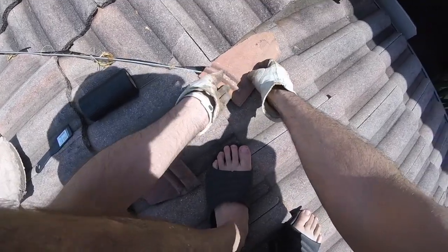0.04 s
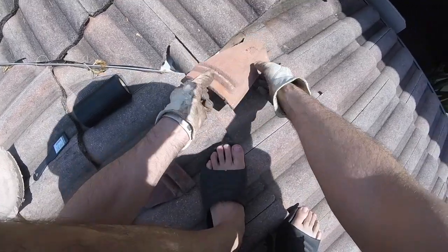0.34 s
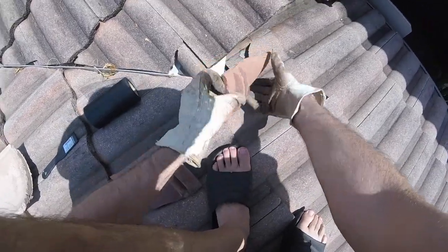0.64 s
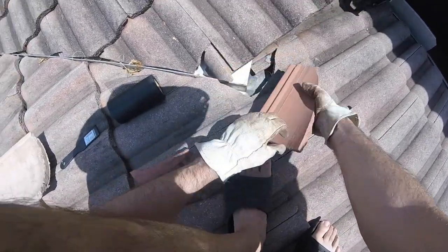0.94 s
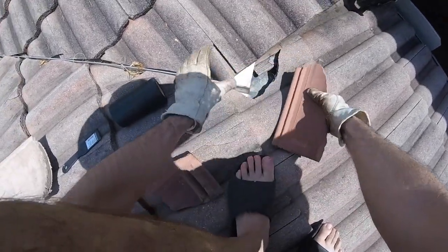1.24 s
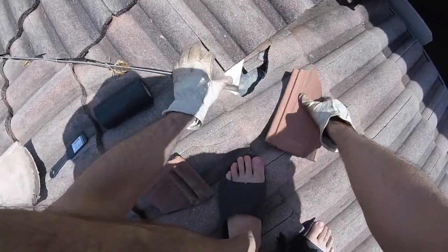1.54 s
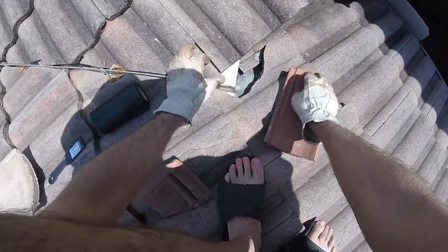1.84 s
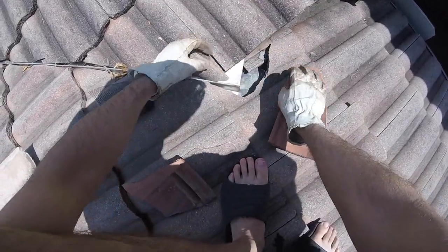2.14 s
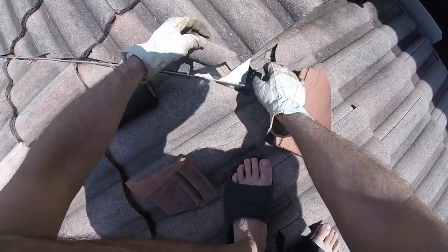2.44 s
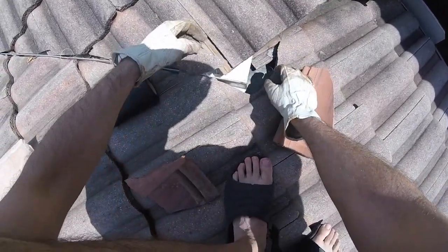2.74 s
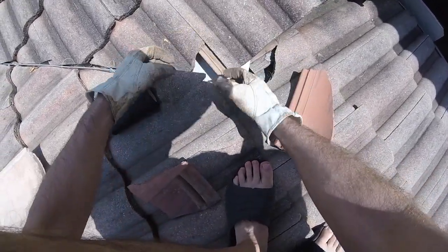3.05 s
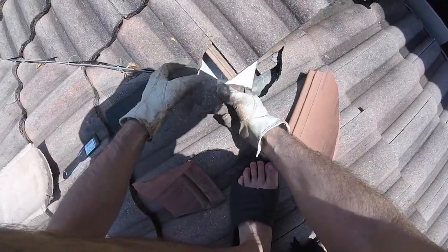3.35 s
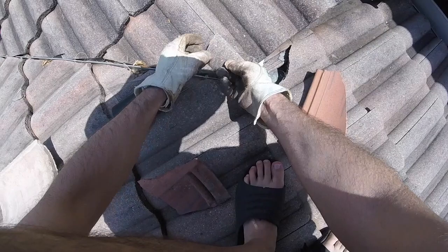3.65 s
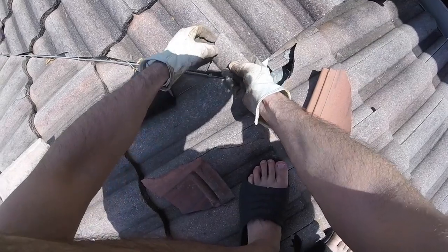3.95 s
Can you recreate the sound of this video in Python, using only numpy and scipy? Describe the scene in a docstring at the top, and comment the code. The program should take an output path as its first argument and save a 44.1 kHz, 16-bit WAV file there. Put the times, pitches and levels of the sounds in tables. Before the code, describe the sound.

Ceramic tile pieces scrape, clink and knock on a roof, with wind rumbling on the microphone.

```python
"""Wind rumbles on a head-worn camera's microphone as a long tile offcut is dragged over a tiled roof.
The offcut is set down and slid along, a broad tile knocks and is shifted, and a small shard clinks.
Each piece rings with its own fading tones (modes), set off by a tap or by sand catching under it.
Gloves rub, crumbs of tile drop and the roof adds a short echo. The wind gusts throughout."""
import sys
import numpy as np
from scipy import signal
from scipy.fft import rfft, irfft
from scipy.io import wavfile
from scipy.ndimage import uniform_filter1d, map_coordinates

SR = 44100
rng = np.random.default_rng(int(sys.argv[2]) if len(sys.argv) > 2 else 0)


def wav_out(sig):
    """Save sig, one row per channel (or a flat mono array), as 16-bit PCM at SR to the path in sys.argv[1]."""
    wavfile.write(sys.argv[1], SR, np.round(np.clip(np.atleast_2d(sig).T, -1, 1) * 32767).astype(np.int16))


N = 176400

# Levels in mode and colour tables are relative; t60 is the time a tone takes to fade by 60 dB.
# the offcut's tones: f/Hz, t60/s, then level/dB when touched on its end, face, edge, corner
OFFCUT_MODES = [(1093, 0.26, 5, -14.5, 1, 0.5), (1337, 0.042, 2, -1, 1.5, -7),
                (1376, 0.3, -6, -9.5, 1, -7.5), (2560, 0.17, -9.5, -4.5, 0.5, -15),
                (2960, 0.045, -15.5, 6, 7.5, -22), (3041, 0.12, -10.5, 3.5, -5.5, -10.5),
                (3650, 0.09, -10, -11, 6.5, -16), (3880, 0.13, -42, 0.5, -27, -33),
                (4450, 0.38, -15, -11, -27, -5), (4686, 0.087, -2, -0.5, 8, -3),
                (5050, 0.062, -11.5, 5, -1, -5), (6280, 0.074, -4.5, -6.5, -5, 0.5),
                (6520, 0.11, -12, -27, -1, -6), (7500, 0.042, -33, -9.5, -7, -32),
                (8270, 0.056, -25, -16, -10, -9), (9470, 0.079, -36, -25, -10, -32),
                (10590, .09, -40, -20, -33, -23.5)]
# the offcut touches the roof: t/s, ring/dB, clack/dB, treble tilt/dB per octave, place touched
OFFCUT_TAPS = [(.086, -45.5, -57, -1.5, "face"), (.243, -25, -41.5, 0.5, "face"),
               (.317, -21, -30, 0, "face"), (.362, -21, -38, -16.5, "face"),
               (0.421, -25.5, -27.5, -9, "face"), (1.2985, -21.5, -19.5, -2.5, "end"),
               (1.3263, -33, -44, 11, "end"), (1.3371, -29, -37, 0.5, "edge"), (1.42, -35, -42, 5.5, "end"),
               (1.4705, -41, -35, 0, "end"), (1.6375, -40, -60, 6.5, "end"),
               (1.7584, -39.5, -58, 10, "end"), (1.9003, -46.5, -45.5, 4, "corner"),
               (2.557, -39, -37.5, -5.5, "edge"), (2.699, -52.5, -64, -4, "corner"),
               (2.786, -38, -51, -2.5, "corner"), (2.818, -42.5, -34.5, -1.5, "corner"),
               (2.893, -39.5, -41, 0, "corner"), (2.955, -53.5, -44, -1, "face"),
               (3.0308, -43, -47, 1, "end"), (3.202, -46, -54, -6, "face"),
               (3.217, -44.5, -54, 4.5, "face"), (3.255, -39.5, -55, 4.5, "end"),
               (3.5498, -42.5, -63, 1.5, "end")]
# the offcut rings as it is dragged on its face: t/s, level/dB
DRAG_LEVELS = [(.21, -58), (.238, -31), (.247, -28), (.33, -28), (.38, -22.5), (.425, -32.5), (.44, -43),
               (.472, -38), (.5, -86)]
# the roof grinds beneath it: t/s, level/dB
GRIND_LEVELS = [(.228, -79), (.246, -32), (.35, -33), (.41, -29), (.44, -35.5), (.477, -29), (.52, -58)]
# the offcut slides on its edge: t/s, level/dB
SLIDE_LEVELS = [(1.325, -59), (1.345, -46), (1.378, -30.5), (1.455, -39), (1.482, -27), (1.55, -33),
                (1.575, -56), (1.75, -65)]
# the dead clack of tile lying on tile: f/Hz, level/dB
CLACK_COLOUR = [(100, -3), (330, 10), (620, 2.5), (2800, -10.5), (4500, -5.5), (6500, -12), (9000, -23.5),
                (14000, -41)]
# the broad tile's tones, damped by the glove: f/Hz, t60/s, level/dB
BROAD_TILE_MODES = [(793, 0.043, -2.5), (1402, 0.044, 1), (1520, .06, -1), (1797, 0.031, -1),
                    (1898, 0.015, 11), (2144, 0.021, 4), (2760, 0.029, 7), (2990, 0.031, 3.5),
                    (5564, 0.082, -6.5)]
# the broad tile knocks on the roof: t/s, level/dB, treble tilt/dB per octave
KNOCKS = [(1.5638, -16.5, -2.5), (1.5668, -17, -2.5), (1.5712, -24, -2.5), (1.583, -25.5, -6.5)]
# the shard's tones: f/Hz, t60/s, then level/dB when touched on its side, on a corner
SHARD_MODES = [(1694, 0.081, -3, 0), (3877, 0.13, 4, 0.5), (4718, 0.11, -10, 5), (5220, 0.026, 1, -6),
               (7980, 0.077, -8.5, -2), (10130, 0.042, -27, -14.5)]
# the shard touches other tiles: t/s, ring/dB, clack/dB, treble tilt/dB per octave, place touched
SHARD_TAPS = [(1.98, -32, -38, 2.5, "side"), (2.357, -47.5, -41, 1, "corner"),
              (2.408, -42, -37.5, 0, "side"), (2.432, -41, -40.5, 0, "side"),
              (2.509, -29, -29.5, 1, "side"), (3.585, -23.5, -26.5, 1.5, "corner")]
# a tile is shoved over the gritty roof: t/s, level/dB, width/s, centre f/Hz
SCUFFS = [(.385, -32, 0.039, 1160), (0.853, -43, 0.019, 1090), (1.999, -32, 0.023, 3160),
          (2.075, -45.5, 0.06, 2520), (2.178, -45.5, 0.0077, 2500), (2.258, -40, .016, 3560),
          (2.301, -29.5, 0.0092, 1030), (2.439, -37.5, 0.032, 910), (2.494, -38, 0.0053, 2200)]
# crumbs of tile drop: t/s, level/dB
CRUMB_DROPS = [(1.936, -37), (3.687, -52), (3.701, -45), (3.713, -43)]
# a crumb's tick: f/Hz, level/dB; and its fade time
CRUMB_COLOUR, CRUMB_FADE_S = [(1200, -21), (3800, 9), (11000, -31)], 0.00093
# gloves rub on tile: t/s, level/dB
RUB_LEVELS = [(0, -63.5), (.13, -51.5), (.55, -52), (.71, -61.5), (.8, -55), (1.04, -48.5), (1.16, -51),
              (1.23, -65), (1.66, -49), (1.87, -55.5), (2.74, -62), (3.18, -54.5), (3.28, -43.5),
              (3.38, -53), (3.72, -60.5), (4, -57)]
# the hiss of that rubbing: f/Hz, level/dB
RUB_COLOUR = [(400, 5), (1200, 2.5), (2500, -1), (6000, -3.5), (10000, -20.5), (14000, -35)]
# gusts on the microphone: t/s, level/dB
WIND_LEVELS = [(0, -34.5), (.17, -39), (.26, -24), (.45, -34), (.62, -24), (.9, -36), (1.05, -22.5),
               (1.27, -31), (1.34, -17), (1.68, -25), (1.78, -22), (2.2, -28.5), (2.42, -24), (2.68, -23.5),
               (2.75, -36.5), (2.82, -20.5), (3.25, -23.5), (3.49, -30.5), (3.84, -22), (4, -19)]
# the wind's rumble: f/Hz, level/dB
WIND_COLOUR = [(8, -20.5), (25, 0.5), (55, 0), (120, -6), (200, -15.5), (320, -25), (1000, -56.5),
               (6000, -87)]
# small whirls of air hit the microphone: t/s, pulse/dB, pulse width/s, swirl/dB
EDDIES = [(1.343, -13, 0.0059, -27), (1.48, -11, 0.0046, -25.5), (2.8174, -4, 0.0022, -28),
          (3.136, -14.5, 0.0015, -31), (3.236, -16.5, 0.001, -30), (3.835, -10, 0.002, -37.5)]
# still outdoor air and microphone hiss: f/Hz, level/dB
AIR_COLOUR = [(1200, -2.5), (4500, -29), (5700, -27), (6500, -4.5), (8000, -14), (14000, -26.5)]

CONTACT_S, CLACK_T60_S = 0.00041, 0.052
GRIP_T60_SCALE, DRAG_T60_SCALE = 0.62, 0.55
CHATTER_PER_S, CHATTER_FADE_S, CHATTER_DB = 900, 0.016, -3
BEND_SHARE, BEND_HZ = .002, 40
FINE_GRAINS_PER_S, COARSE_GRAINS_PER_S, GRAIN_SPREAD_DB = 2500, 1000, 1.5
STICK_SLIP_HZ, STICK_SLIP_DB = 88, 3.5
SLIDE_GRIT_DB, KNOCK_CLACK_DB, SCUFF_RING_DB, AIR_DB = -4.5, -3.5, -10.5, -60
LUMP_HZ, LUMP_DB, FLUTTER_DB, FLUTTER_FROM_HZ = 23.5, 4.5, 3, 103
SWIRL_BAND_HZ, SWIRL_S = (172, 400), 0.0084
ECHO_DELAY_S, ECHO_T60_S, ECHO_DB = .003, 0.13, -15


def offcut():
    """The long piece scrapes and taps. Unless it lands on its end, a tap chatters and dies sooner."""
    hz, t60, *columns = np.transpose(OFFCUT_MODES)
    mode_db = dict(zip(("end", "face", "edge", "corner"), columns))
    face_grit = grit(FINE_GRAINS_PER_S)
    edge_grit = grit(COARSE_GRAINS_PER_S) * level(SLIDE_LEVELS)
    out = scrape(face_grit * level(DRAG_LEVELS), hz, t60 * DRAG_T60_SCALE, mode_db["face"])
    out += colour(face_grit, CLACK_COLOUR, tilt_db=-1.0) * level(GRIND_LEVELS)
    out += scrape(edge_grit, hz, t60, mode_db["edge"])
    out += amp(SLIDE_GRIT_DB) * through(edge_grit, clack(tilt_db=-1.0))
    for s, ring_db, clack_db, tilt_db, contact in OFFCUT_TAPS:
        loose = contact == "end"
        note = ring(hz, t60 * (1 if loose else GRIP_T60_SCALE), mode_db[contact], tilt_db)
        add(out, s, amp(ring_db) * (note if loose else chatter(note)))
        add(out, s, amp(clack_db) * clack(tilt_db))
    return out


def broad_tile():
    """The tile, held in a glove, lands with a quick run of dull knocks."""
    out = np.zeros(N)
    for s, db, tilt_db in KNOCKS:
        add(out, s, amp(db) * ring(*np.transpose(BROAD_TILE_MODES), tilt_db))
        add(out, s, amp(db + KNOCK_CLACK_DB) * clack(tilt_db))
    return out


def shard():
    """The small piece clinks, and the tiles it touches clack."""
    hz, t60, side_db, corner_db = np.transpose(SHARD_MODES)
    out = np.zeros(N)
    for s, ring_db, clack_db, tilt_db, contact in SHARD_TAPS:
        mode_db = corner_db if contact == "corner" else side_db
        add(out, s, amp(ring_db) * ring(hz, t60, mode_db, tilt_db))
        add(out, s, amp(clack_db) * clack(tilt_db))
    return out


def ring(hz, t60, db, tilt_db=0):
    """A struck piece rings with fading tones; tilt_db per octave makes it brighter or duller."""
    t = np.arange(SR // 2) / SR
    gains = amp(db + tilt_db * np.log2(hz / hz[0])) * rng.choice([-1, 1], len(hz))
    tones = amp(-60 * t / t60[:, None]) * np.sin(2 * np.pi * hz[:, None] * t)
    return struck(gains @ tones)


def clack(tilt_db):
    """The tiles laid on the roof ring so densely and briefly that it is a burst of noise."""
    t = np.arange(SR // 5) / SR
    noise = colour(rng.standard_normal(len(t)), CLACK_COLOUR, tilt_db)
    return struck(noise * amp(-60 * t / CLACK_T60_S))


def struck(x):
    """A blow builds up over its contact time; its first 10 ms are scaled to a level of one."""
    t = np.arange(len(x)) / SR
    x = x * (1 - np.exp(-(t / CONTACT_S) ** 2))
    return x / np.sqrt(np.mean(x[:SR // 100] ** 2) + 1e-20)


def chatter(note):
    """Rough edges touch again several times just after a blow; the total energy stays the same."""
    t = np.arange(SR // 20) / SR
    touches = rng.standard_normal(len(t)) * (rng.random(len(t)) < CHATTER_PER_S / SR)
    touches *= amp(CHATTER_DB) * np.exp(-t / CHATTER_FADE_S)
    rattled = note + signal.fftconvolve(note, touches)[:len(note)]
    return rattled * np.linalg.norm(note) / np.linalg.norm(rattled)


def grit(per_s):
    """Sand grains catch and break free in quick spurts, under an even push."""
    sizes = amp(GRAIN_SPREAD_DB * np.minimum(rng.exponential(1, N), 4))
    grains = sizes * rng.choice([-1, 1], N) * (rng.random(N) < per_s / SR)
    grains *= amp(STICK_SLIP_DB * wander(STICK_SLIP_HZ))
    local_power = abs(uniform_filter1d(grains ** 2, SR // 30))
    return grains / np.sqrt(local_power + 1e-6)


def scrape(friction, hz, t60, db):
    """Friction sets a sliding piece ringing; the piece rocks, which bends its pitch a little."""
    bent_positions = np.arange(N) + np.cumsum(BEND_SHARE * wander(BEND_HZ))
    ringing = through(friction, ring(hz, t60, db))
    return map_coordinates(ringing, [bent_positions], order=3)


def scuffs(band_ratio=4.6):
    """Each short shove crushes sand under a tile, which rings dully with the roof."""
    t = np.arange(N) / SR
    grains = grit(COARSE_GRAINS_PER_S)
    roof = colour(grains, CLACK_COLOUR, tilt_db=-1.0)
    tile = through(grains, ring(*np.transpose(BROAD_TILE_MODES), tilt_db=7.5))
    crunch = unit(roof + amp(SCUFF_RING_DB) * tile)
    out = np.zeros(N)
    for s, db, width, hz in SCUFFS:
        shove = amp(db) * np.exp(-abs(t - s) / width)
        out += shove * band(crunch, hz / band_ratio, hz * band_ratio)
    return out


def crumbs():
    """Loose crumbs of tile drop on the roof with dry ticks."""
    out, t = np.zeros(N), np.arange(SR // 20) / SR
    for s, db in CRUMB_DROPS:
        tick = colour(rng.standard_normal(len(t)), CRUMB_COLOUR) * np.exp(-t / CRUMB_FADE_S)
        add(out, s, amp(db) * tick)
    return out


def gloves():
    """Leather brushes over sandy tile."""
    return colour(grit(FINE_GRAINS_PER_S) + rng.standard_normal(N), RUB_COLOUR) * level(RUB_LEVELS)


def roof_echo(x):
    """The roof throws the sound back as a short scatter of echoes."""
    t = np.arange(SR // 3) / SR
    echoes = rng.standard_normal(len(t)) * (rng.random(len(t)) < 1 / 10)
    fade = (t > ECHO_DELAY_S) * amp(-60 * t / ECHO_T60_S)
    return amp(ECHO_DB) * through(x, echoes * fade)


def wind():
    """Gusts rumble in lumps, the deep part swinging most; each eddy adds a thump and a short swirl."""
    rumble = colour(rng.standard_normal(N), WIND_COLOUR)
    deep = signal.sosfiltfilt(signal.butter(2, FLUTTER_FROM_HZ, fs=SR, output="sos"), rumble)
    upper = rumble - deep
    lumps = wander(LUMP_HZ)
    out = unit(deep * amp(LUMP_DB * lumps) + upper * amp(FLUTTER_DB * lumps)) * level(WIND_LEVELS)
    swirl = band(rng.standard_normal(N), *SWIRL_BAND_HZ, order=2)
    for s, pulse_db, width, swirl_db in EDDIES:
        t = np.arange(N) / SR - s
        out += amp(pulse_db) * (1 - (t / width) ** 2) * np.exp(-(t / width) ** 2 / 2)
        out += amp(swirl_db) * swirl * np.exp(-(t / SWIRL_S) ** 2)
    return out


def air():
    """Outdoor air and the microphone make a faint, steady hiss."""
    return amp(AIR_DB) * colour(rng.standard_normal(N), AIR_COLOUR)


def amp(db):
    """Turns decibels into a gain."""
    return 10 ** (np.asarray(db) / 20)


def unit(x):
    """Scales a sound to an average (rms) level of one."""
    return x / np.sqrt(np.mean(x ** 2) + 1e-20)


def level(points):
    """Gain along a level curve, silent outside it."""
    s, db = np.transpose(points)
    return amp(np.interp(np.arange(N) / SR, s, db, left=-150, right=-150))


def colour(x, points, tilt_db=0):
    """Filters by a colour table, tilted by tilt_db per octave above 500 Hz, to a level of one."""
    hz, db = np.transpose(points)
    octave = np.log2(np.fft.rfftfreq(len(x), 1 / SR) + 1)
    slope_db = tilt_db * np.maximum(octave - np.log2(500), 0)
    gain = amp(np.interp(octave, np.log2(hz), db) + slope_db)
    return unit(irfft(rfft(x) * gain, len(x)))


def band(x, low_hz, high_hz, order=1):
    """Gently filters out what lies outside a band, and scales the rest to a level of one."""
    edges_hz = (low_hz, min(high_hz, SR / 2 - 1))
    return unit(signal.sosfilt(signal.butter(order, edges_hz, "bandpass", fs=SR, output="sos"), x))


def wander(hz):
    """A smooth random wobble of size one, up to about the given rate."""
    f = np.fft.rfftfreq(N, 1 / SR)
    return unit(irfft(rfft(rng.standard_normal(N)) * np.exp(-(f / hz) ** 2), N))


def through(drive, body):
    """Passes a sound through a ringing body, at about the same level."""
    return signal.fftconvolve(drive, body / np.linalg.norm(body))[:N]


def add(mix, s, sound):
    """Mixes a sound in, starting at s seconds."""
    part = mix[round(s * SR):][:len(sound)]
    part += sound[:len(part)]


def scene():
    """Tiles and gloves with their echo, then wind and air, in one channel."""
    tiles = offcut() + shard() + broad_tile() + scuffs() + crumbs() + gloves()
    return (tiles + roof_echo(tiles) + wind() + air())[None]


def record(dry):
    """The camera cuts off the treble above 14300 Hz."""
    low_pass = signal.firwin(511, 14300, window=("kaiser", 9), fs=SR)
    return signal.oaconvolve(dry, low_pass[None], "same")


dry = scene()
out = record(dry)
wav_out(out)
```